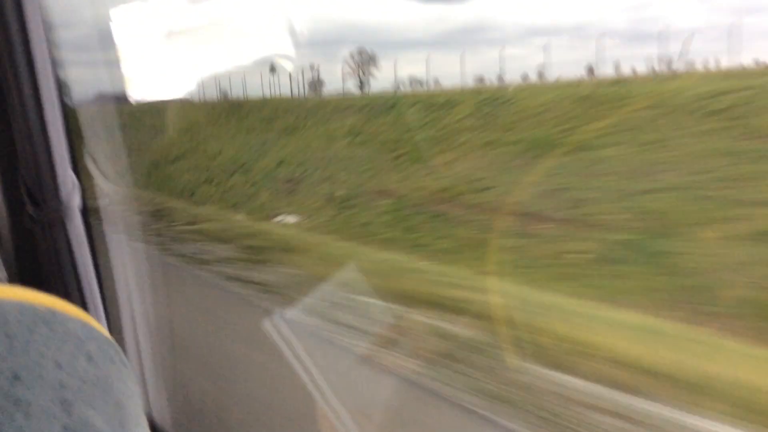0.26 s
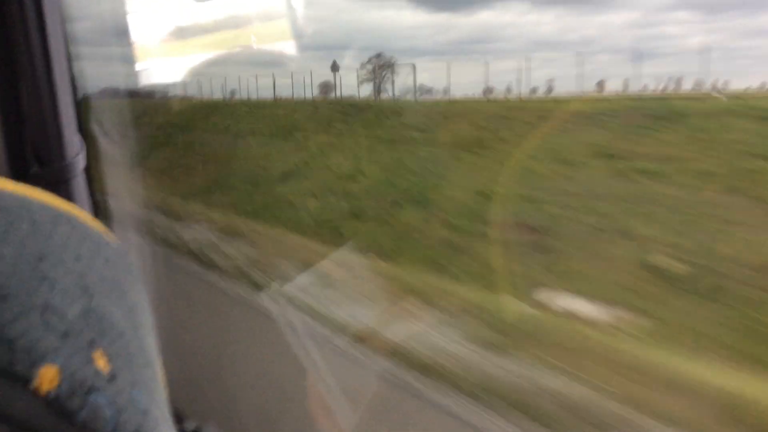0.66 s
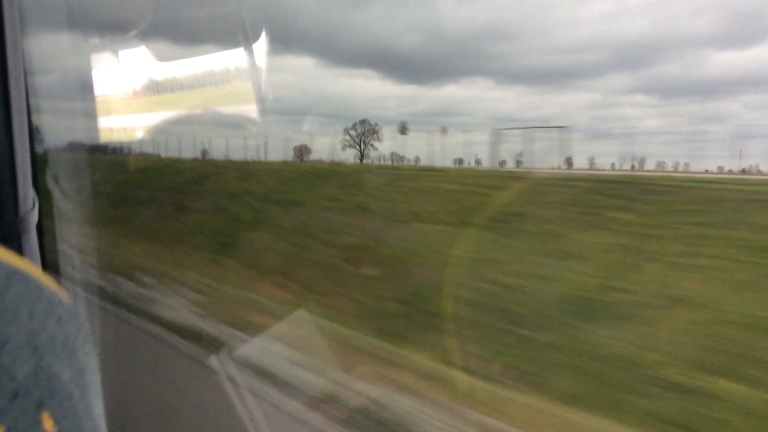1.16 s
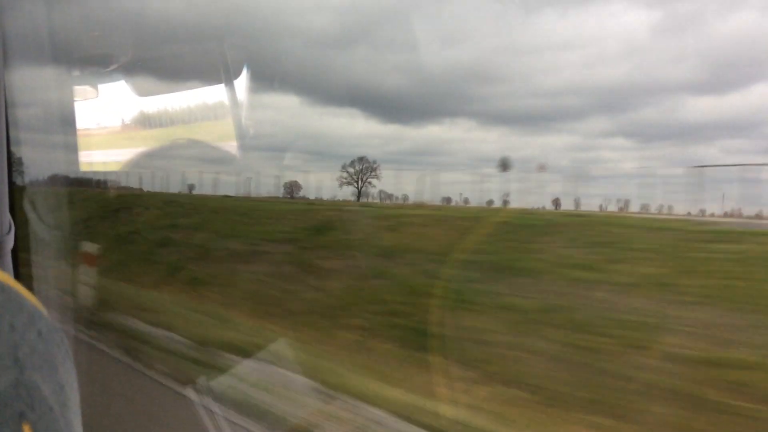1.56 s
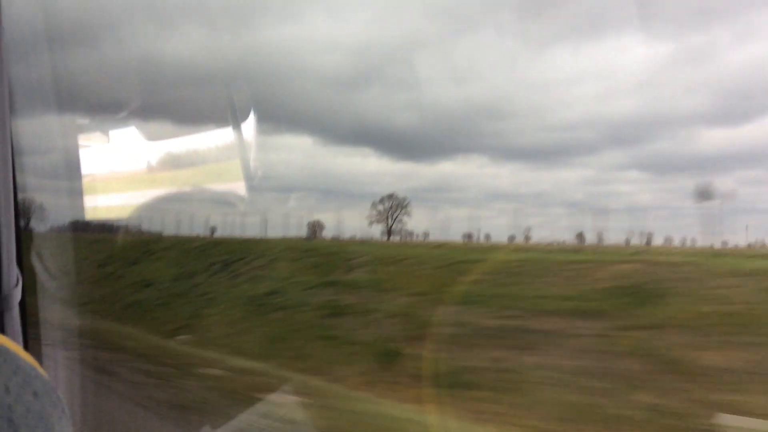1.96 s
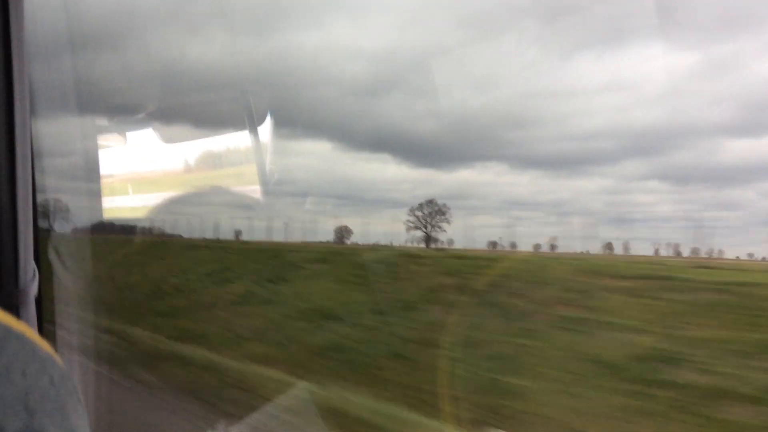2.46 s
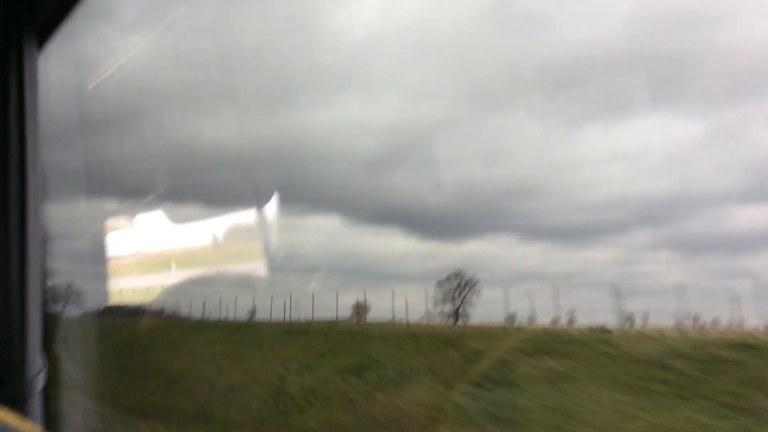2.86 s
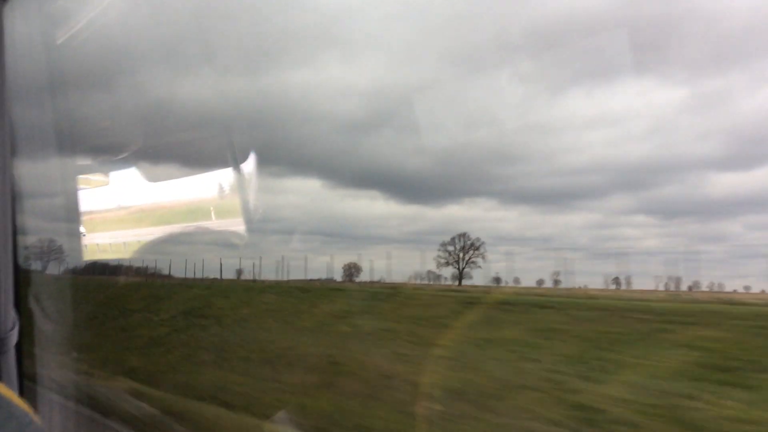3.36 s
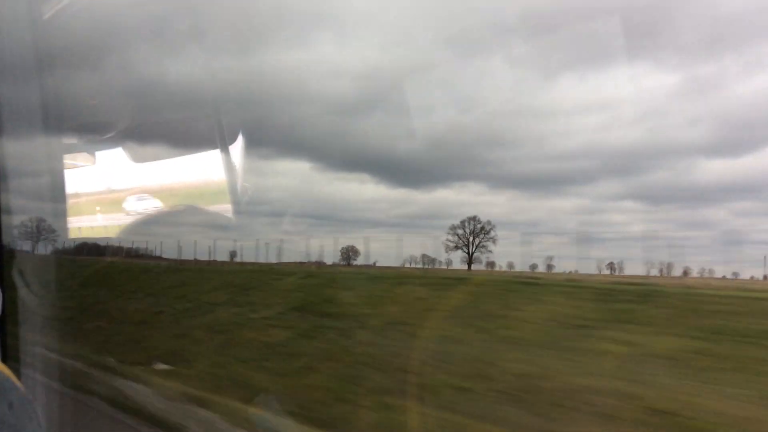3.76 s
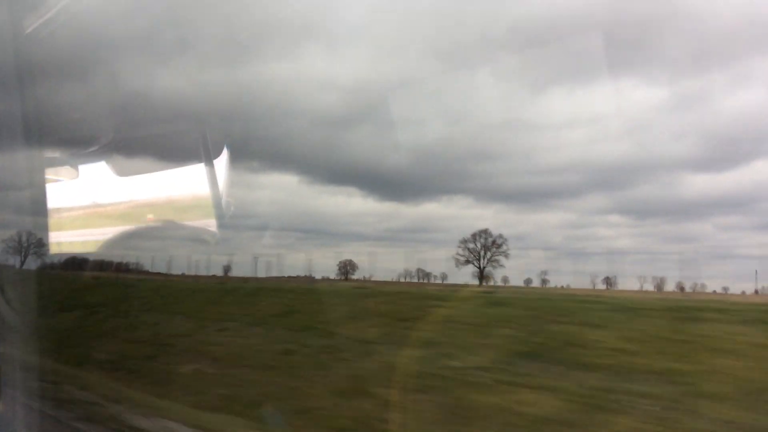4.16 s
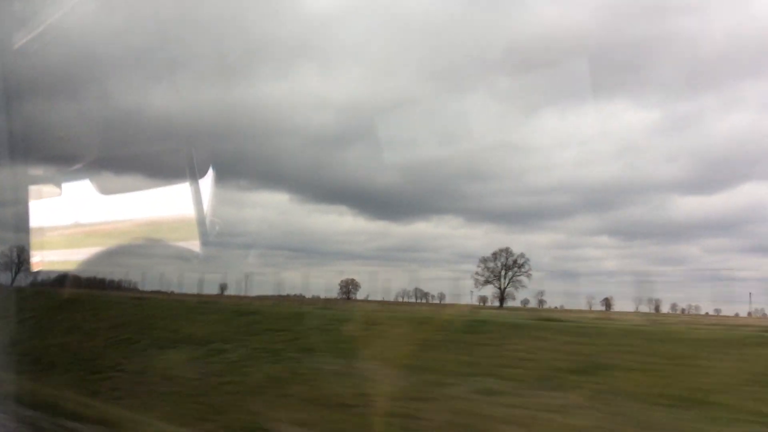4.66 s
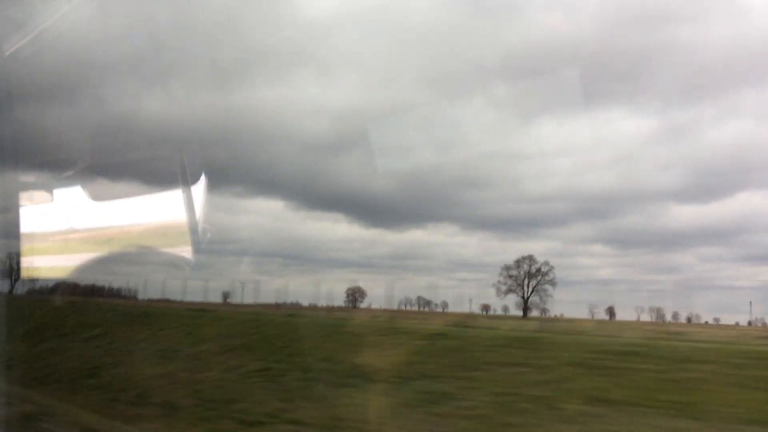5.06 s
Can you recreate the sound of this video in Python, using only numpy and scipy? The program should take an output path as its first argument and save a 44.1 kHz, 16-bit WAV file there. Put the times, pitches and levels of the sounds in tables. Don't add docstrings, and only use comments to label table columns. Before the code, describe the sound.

A fingertip crackles loudly across a phone microphone, then lightly twice more, over the deep uneven boom and dull road roar of a coach cabin.

```python
import sys
import numpy as np
from scipy import signal
from scipy.fft import rfft, irfft
from scipy.io import wavfile
from scipy.ndimage import uniform_filter1d

SR = 44100
rng = np.random.default_rng(int(sys.argv[2]) if len(sys.argv) > 2 else 0)


def wrap_up_sound(samples):
    columns = np.atleast_2d(samples).T
    tamed = np.clip(columns, -1, 1)
    steps = np.round(tamed * 32767).astype(np.int16)
    wavfile.write(sys.argv[1], SR, steps)


def volts_from_decibels(level):
    exponent = np.asarray(level, float) / 20
    return 10 ** exponent


N = 234523

# (start [s], length [ms], height [dB], spike width [ms])
RIDGE_RUNS = [(.4093, 5.7, -4.5, .55), (.4171, 2, -3, .82), (.4227, 3.7, -1.5, .56), (.4339, 2, -.4, .38),
              (.4616, 1, -1.6, .37), (.4652, 1.6, -3.7, .47), (.4686, 3.3, -1.6, .35),
              (.4809, 3.3, -6.5, .32), (.486, 2.6, -10, .24), (.509, 2.7, -1.5, .42),
              (.5197, 1.3, -1.5, .21), (.5272, 1.2, -3.6, .23), (.5314, 1.3, -2, .3),
              (.5465, 4.6, -2.7, .2), (.5532, 2.3, -7, .16), (.5596, 4.3, -2, .3), (.5655, 4.5, -.5, .45),
              (.5707, 3.5, -.1, .3), (.5785, 4.9, -1.5, .3), (.5848, 3, -1.3, .17), (.5917, 3, -3.3, .5),
              (.5988, 1.4, -2.2, .3), (.6143, 1.5, -5.6, .14), (.6181, 1.5, -5.3, .4),
              (.6829, 2.4, -3.1, .21), (1.5271, 2.1, -4.5, .49), (1.54, 2.3, -12, .29),
              (1.5492, 2.8, -5, .4), (1.5876, 3.9, -13, .47), (3.8012, 1.2, -3, .45)]
# (time [s], height [dB], spike width [ms])
RIDGE_POPS = [(.4281, -5.9, .56), (.4382, -8.3, .77), (.4465, -.5, 1.18), (.4573, -2.3, .73),
              (.4782, -2.8, .46), (.5176, -2, .22), (.5227, -.8, .23), (.5251, -5.7, .18),
              (.5366, -3.4, .33), (.6352, -4.3, .45), (.7434, -10.6, .38), (.6585, -9.6, .82),
              (.6607, -10.5, .54), (.6787, -5.3, .28), (.6899, -8.7, .54), (.7002, -9, .5),
              (.7294, -10.2, 1.02), (.7414, -7.6, .42), (1.4734, -12.8, .71), (1.5164, -5, .52),
              (1.5183, -4, .53), (1.5213, -6.1, .4), (1.5449, -3.4, .35), (1.5477, -1.3, .12),
              (1.5727, -1.7, .43), (3.7571, -18, .6), (3.7788, -14, .8), (3.7863, -13, .55),
              (3.8209, -9.5, .95), (3.8423, -23, .9)]
# (start [s], length [s], level [dB])
FINGER_DRAGS = [(.395, 0.0072, -31), (.407, 0.062, -23), (.493, 0.013, -39.5), (.507, 0.074, -29),
                (.547, 0.054, -20), (.603, 0.058, -31), (.67, .031, -35), (.705, 0.039, -52.5),
                (.741, 0.0068, -44), (.749, 0.0065, -48), (1.455, 0.043, -49), (1.4655, .0015, -27),
                (1.5, 0.013, -42), (1.516, 0.036, -28), (1.558, 0.0358, -32), (1.598, 0.013, -44.5),
                (3.754, 0.047, -41), (3.802, 0.0025, -23), (3.808, 0.023, -47.5), (3.84, 0.01, -48)]
# (start [s], length [s], level [dB])
HAND_RUSTLES = [(.07, .04, -77), (.78, .07, -74), (.88, .07, -71), (1.3, .36, -74), (1.88, .05, -73),
                (2.07, .02, -74.5), (2.14, .08, -73), (2.35, .17, -73), (3.31, .05, -78), (3.5, .2, -83)]
# (frequency [Hz], level [dB per Hz])
SKIN_COLOUR = [(1200, -14), (2800, -11), (3500, -8), (5800, 0), (7700, -7), (10700, -8), (14000, -6),
               (15300, -11)]
# (time [s], knock level [dB], tick level [dB])
KNOCKS_AND_TICKS = [(0.0774, -56, -69), (0.0894, -63, -70), (0.8994, -64, -66), (0.9344, -65, -64),
                    (1.1394, -65, -75), (1.2194, -66, -72), (1.2744, -63, -62), (1.2894, -62, -62),
                    (1.3494, -68, -67), (1.6724, -63, -61), (1.7194, -69, -69), (2.0194, -62, -66),
                    (2.0354, -62, -65), (2.1354, -68, -64), (2.2254, -64, -70), (2.2967, -57, -69),
                    (2.3654, -68, -60), (2.3894, -69, -62), (2.8514, -62, -81), (3.1394, -62, -80),
                    (3.3094, -71, -68), (3.5744, -64, -74), (3.9794, -67, -78), (4.2624, -64, -67),
                    (4.2714, -64, -72), (4.2864, -69, -68), (4.3424, -70, -70), (5.0444, -66, -69)]
# (time [s], short ripples [dB], long waves [dB])
ROAD_SURFACE = [(0, 6.5, -6), (.13, -4, -2), (.3, 5, -0.5), (.6, -1.5, 3), (.8, 5, -1.5), (.98, -11, 0.5),
                (1.14, 9, 0.5), (1.33, -3, 0.5), (1.53, 2, 0.5), (1.66, -6, -4.5), (1.85, 6, 0),
                (2.4, 3, 0.5), (2.63, -8.5, -6.5), (2.88, 4.5, -0.5), (3.7, 0.5, 0), (4.3, 2, -0.5),
                (4.7, 3, 2.5), (5.32, -0.5, 0)]
# (frequency [Hz], width [Hz], level [dB])
BODY_MODES = [(14, 9, 0), (26, 12, -4), (37, 10, -6)]
# (frequency [Hz], width [Hz], level [dB])
FLOOR_MODES = [(52, 5, 0), (63, 5, -8)]
# (frequency [Hz], width [Hz], level [dB])
AIR_MODES = [(81, 17, -7), (89, 15, 9)]
# (frequency [Hz], width [Hz], level [dB])
PANEL_MODES = [(112, 38, 0.5), (150, 31, -6), (180, 10, -3), (192, 56, -2), (235, 36, -9.5), (297, 32, -4)]
# (level [dB], share of ripples [dB/dB], share of waves [dB/dB], wander [dB])
ROAD_ANSWER = [
    (-24, 0, 0.98, 1.24),
    (-29.5, 1.2, 0, 2.5),
    (-32, 0.37, -.3, 2),
    (-41.5, 0.23, -0.18, 1.56),
]
# (frequency [Hz], level [dB per Hz])
ROAR_COLOUR = [(250, -12), (330, -2), (420, -6.5), (700, -7), (900, -12), (1300, -24), (1700, -35),
               (2300, -44), (3800, -52)]
# (time [s], frequency [Hz], level [dB])
GEAR_HUM = [(0, 574, -51), (.35, 575, -50.5), (1.4, 575.3, -50.5), (1.9, 575, -50.5), (2.9, 576.8, -50.5),
            (3.7, 576.8, -51), (4.1, 575.9, -51), (5.32, 575.5, -51.5)]


def curve(rows):
    s, *columns = np.transpose(rows)
    return [np.interp(np.arange(N) / SR, s, c) for c in columns]


def spells(rows, rest_db, rise_db_s, fall_db_s):
    t = np.arange(N) / SR
    level = np.full(N, float(rest_db))
    for start, length, db in rows:
        too_early = np.maximum(start - t, 0)
        too_late = np.maximum(t - start - length, 0)
        level = np.maximum(level, db - rise_db_s * too_early - fall_db_s * too_late)
    return level


def unit(x):
    return x / np.sqrt(np.mean(x ** 2))


def walk(rate):
    k = int(SR / rate)
    steps = np.repeat(rng.standard_normal(N // k + 1), k)
    return unit(uniform_filter1d(uniform_filter1d(steps, k), k)[:N])


def shaped(gain):
    hz = np.maximum(np.fft.rfftfreq(N, 1 / SR), 1)
    return unit(irfft(rfft(rng.standard_normal(N)) * gain(hz), N))


def coloured(points):
    hz, db = np.transpose(points)
    return shaped(lambda f: volts_from_decibels(np.interp(np.log(f), np.log(hz), db, left=-90, right=-90)))


def ringing(modes):
    def resonance(f, hz, width, db):
        return volts_from_decibels(2 * db) / width / (1 + ((f - hz ** 2 / f) / width) ** 2) ** 1.576

    x = shaped(lambda f: np.sqrt(sum(resonance(f, *mode) for mode in modes)))
    x = signal.sosfilt(signal.butter(2, 800, fs=SR, output="sos"), x)
    swell = uniform_filter1d(uniform_filter1d(x ** 2, size=4400), size=4400)
    return unit(x / swell ** .25)


def add_spike(out, s, height, width_ms, lean):
    tip_round = .05
    tau = max(width_ms, .03) * SR / 1000 / np.log(4)
    k = np.arange(max(int(s * SR - 9 * tau), 0), min(int(s * SR + 9 * tau), N))
    t = (k - s * SR) / tau
    leaning = np.where(t < 0, t * lean, t / lean)
    out[k] += height * np.exp(tip_round - np.hypot(leaning, tip_round))


def ridge_spikes():
    ridge_gap_ms, gap_per_width = .4, 1.3
    push, haste = np.zeros((2, N))
    runs = RIDGE_RUNS + [(s, 0, db, width_ms) for s, db, width_ms in RIDGE_POPS]
    chances = rng.standard_normal((len(runs), 4, 16))
    for (s, ms, db, width_ms), (shift, *variety) in zip(runs, chances):
        spikes = 1 + round(ms / (ridge_gap_ms + gap_per_width * width_ms))
        order = np.arange(spikes)
        last = max(spikes - 1, 1)
        inner = (order % last) > 0
        places = (order + inner * np.clip(.29 * shift[:spikes], -.4, .4)) / last
        over = np.clip((db + 5.5) / 4, 0, 1)
        crowd = min(spikes - 1, 2) / 2
        fast = np.clip((.45 - width_ms) / .2, 0, 1)
        add_spike(haste, s + ms / 2000, volts_from_decibels(db) * crowd * fast, .7 * ms + .3, 1.)
        for place, size, wide, lean in zip(places, *variety):
            height = volts_from_decibels(db + 1.8 + 4.5 * over + 1.8 * crowd * size)
            spike_ms = width_ms * volts_from_decibels(-2.5 * over + 2.2 * crowd * wide)
            add_spike(push, s + place * ms / 1000, height, spike_ms, volts_from_decibels(1.5 * lean - 1.5))
    chatter = unit(signal.lfilter(*signal.butter(1, 1500, fs=SR), rng.standard_normal(N)))
    return push * volts_from_decibels((.59 + 14.0 * haste) * chatter)


def drag_grit():
    grit_per_s, soft_widens = 3000, .41
    grit = np.zeros(N)
    chance = rng.random((N, 3))
    drag_db = spells(FINGER_DRAGS, -120, 6001.5, 5997) + 2.5 * walk(250)
    for i in np.flatnonzero((chance[:, 0] < grit_per_s / SR) & (drag_db > -70)):
        _, size, wide = chance[i]
        height = volts_from_decibels(drag_db[i] - 6.4 * np.log(size + .022))
        width_ms = (.093 + .14 * wide) * volts_from_decibels(-soft_widens * (drag_db[i] + 23))
        add_spike(grit, i / SR, height, width_ms, 1.)
    return grit


def fingertip():
    capsule_top, port_hz, port_leak_hz = 1.3, 11200, 58.3
    rebound_hz, rebound = 198, .36
    push = ridge_spikes()
    capsule = capsule_top * np.tanh((push / capsule_top) ** 2) ** .5 + drag_grit()
    rounded = signal.lfilter(*signal.butter(1, port_hz, fs=SR), capsule)
    rounded -= rebound * signal.lfilter(*signal.butter(1, rebound_hz, fs=SR), rounded)
    return signal.lfilter(*signal.butter(1, port_leak_hz, "high", fs=SR), rounded)


def hand_rustle():
    level_db = spells(HAND_RUSTLES, rest_db=-87, rise_db_s=90, fall_db_s=75)
    return coloured(SKIN_COLOUR) * volts_from_decibels(level_db + 2.5 + 1.5 * walk(60))


def knocks_and_ticks():
    out = np.zeros(N)
    t = np.arange(700) / SR
    dull = signal.butter(2, (500, 2200), "band", fs=SR, output="sos")
    thin = signal.butter(2, 3800, "high", fs=SR, output="sos")
    grains = rng.standard_normal((len(KNOCKS_AND_TICKS), 2, 700))
    for (s, knock_db, tick_db), grain in zip(KNOCKS_AND_TICKS, grains):
        knock = signal.sosfilt(dull, grain[0] * t / .003 * np.exp(-t / .004))
        tick = signal.sosfilt(thin, grain[1] * np.exp(-t / .0004))
        start = int(s * SR)
        out[start:start + 700] += volts_from_decibels(knock_db + 13) * knock + volts_from_decibels(tick_db + 12) * tick
    return out


def cabin_boom():
    ripples, waves = curve(ROAD_SURFACE)
    boom = np.zeros(N)
    parts = (BODY_MODES, FLOOR_MODES, AIR_MODES, PANEL_MODES)
    for (db, ripple_share, wave_share, wander_db), modes in zip(ROAD_ANSWER, parts):
        level_db = db + ripple_share * ripples + wave_share * waves + wander_db * walk(7)
        boom += volts_from_decibels(level_db) * ringing(modes)
    return boom


def tyre_roar():
    return coloured(ROAR_COLOUR) * volts_from_decibels(-56.5 + 1.2 * walk(6) + 1.2 * walk(30))


def tone(hz, level_db):
    return np.sqrt(2) * volts_from_decibels(level_db) * np.sin(2 * np.pi * np.cumsum(hz) / SR)


def engine_drone():
    return tone(178 + .8 * walk(3), -47 + 2.5 * walk(5))


def gear_hum():
    hz, db = curve(GEAR_HUM)
    return tone(hz + .4 * walk(6), db + .8 * walk(12))


def circuit_whine():
    level_db = spells([(3.66, .24, -78)], rest_db=-86.5, rise_db_s=200, fall_db_s=200)
    return tone(np.full(N, 14999.), level_db)


def scene():
    touch = fingertip() + hand_rustle() + knocks_and_ticks()
    coach = cabin_boom() + tyre_roar() + engine_drone() + gear_hum()
    return (touch + coach + circuit_whine())[None]


def top_cut(x):
    return signal.sosfilt(signal.butter(12, 16470, fs=SR, output="sos"), x)


def record(dry):
    start_s, top, hiss_db = .0098, .7, -86
    t = np.arange(N) / SR
    opening = np.clip(.25 + (t - start_s) / .01, 0, 1) * (np.arange(N) > start_s * SR)
    live = (dry + volts_from_decibels(hiss_db) * rng.standard_normal(N)) * opening
    clipped = live / (1 + np.abs(live / top) ** 8) ** (1 / 8)
    mix = signal.sosfilt(signal.cheby1(8, .5, 15400, fs=SR, output="sos"), clipped)
    return top_cut(mix)


dry = scene()
out = record(dry)
wrap_up_sound(out)
```